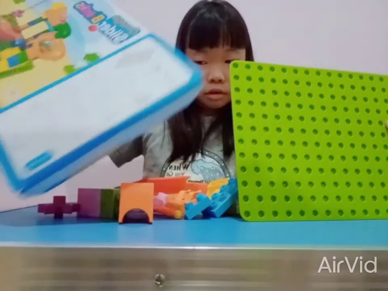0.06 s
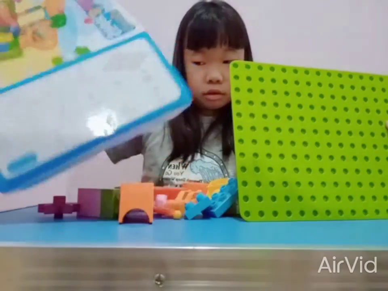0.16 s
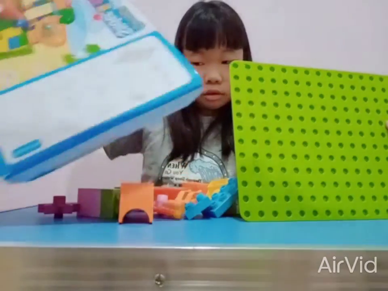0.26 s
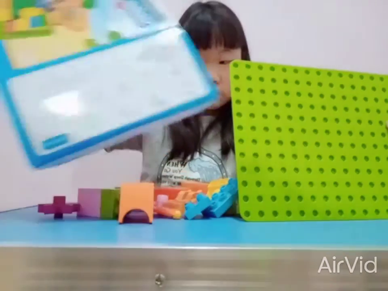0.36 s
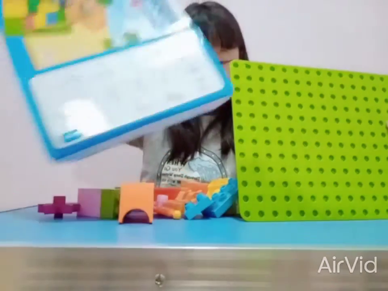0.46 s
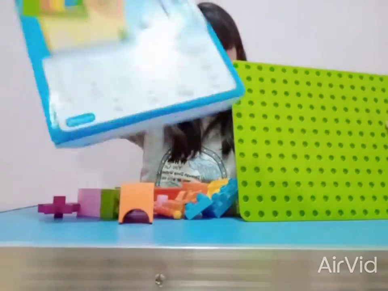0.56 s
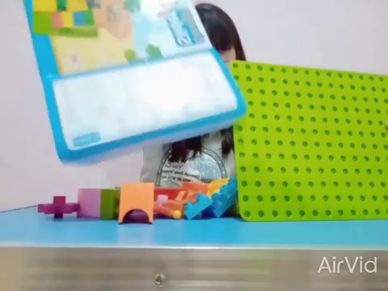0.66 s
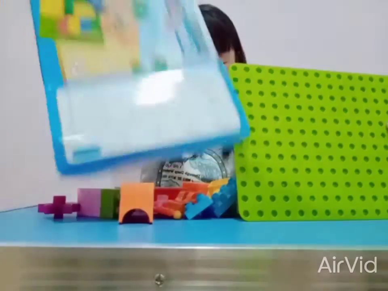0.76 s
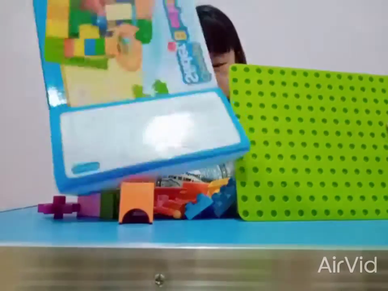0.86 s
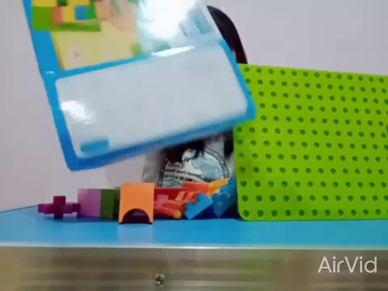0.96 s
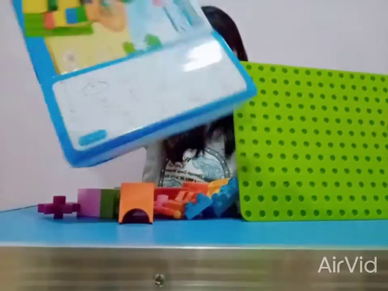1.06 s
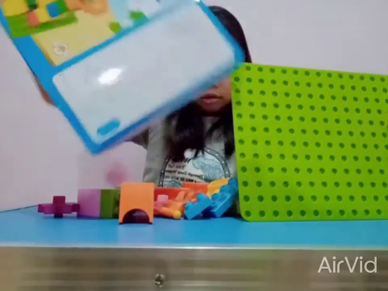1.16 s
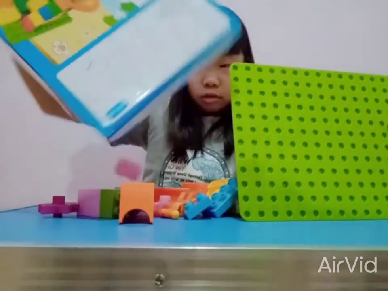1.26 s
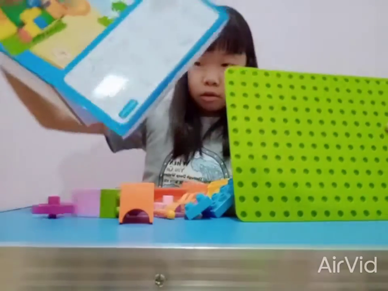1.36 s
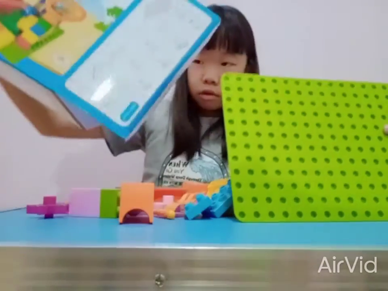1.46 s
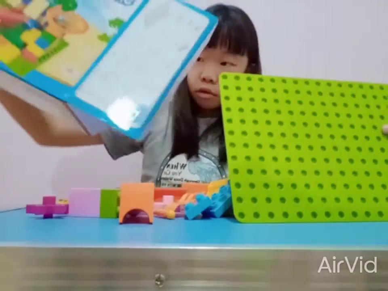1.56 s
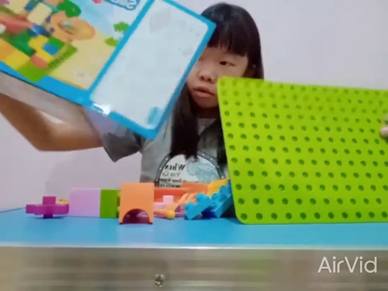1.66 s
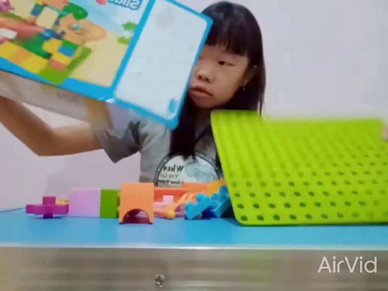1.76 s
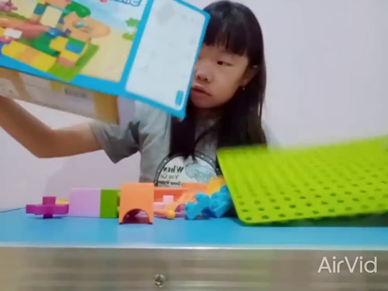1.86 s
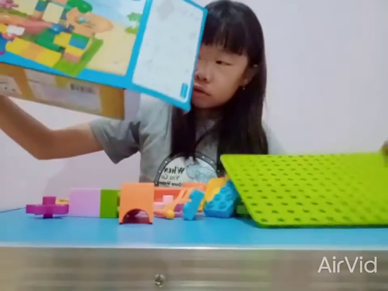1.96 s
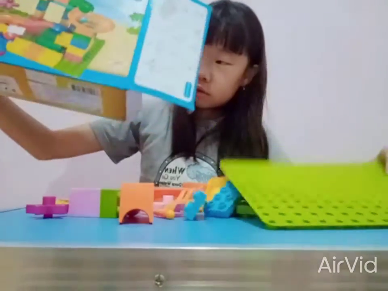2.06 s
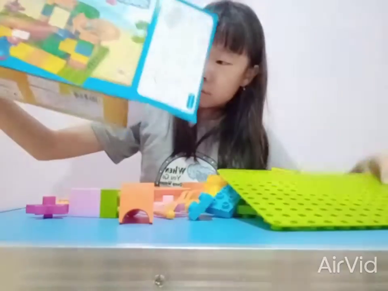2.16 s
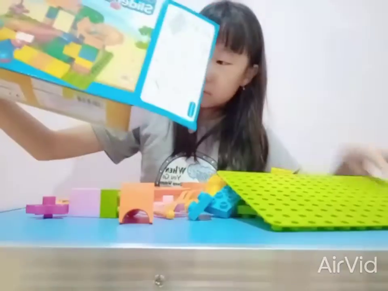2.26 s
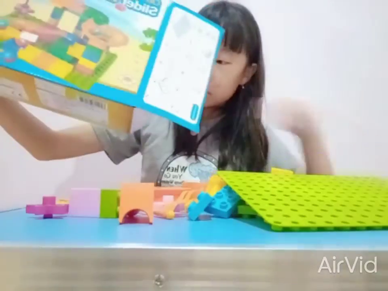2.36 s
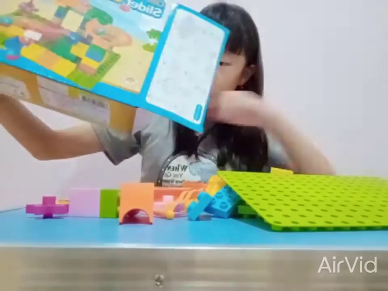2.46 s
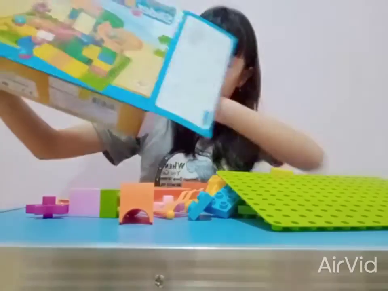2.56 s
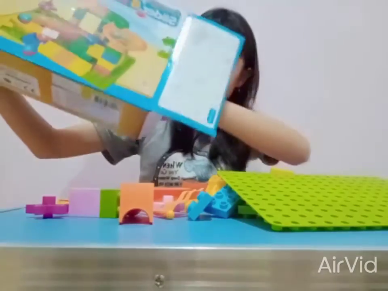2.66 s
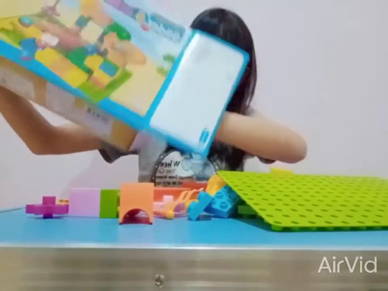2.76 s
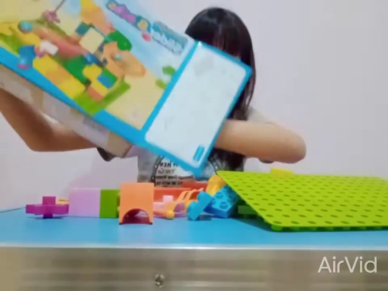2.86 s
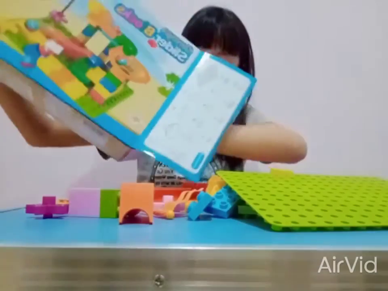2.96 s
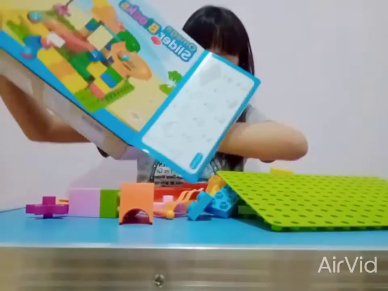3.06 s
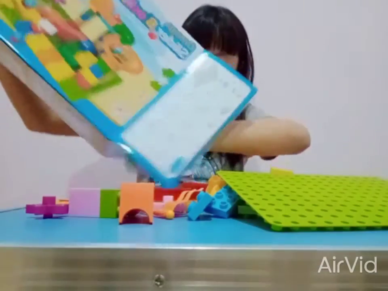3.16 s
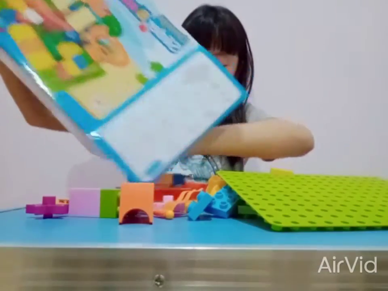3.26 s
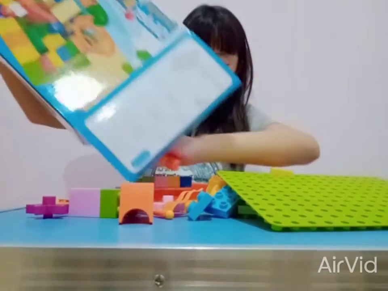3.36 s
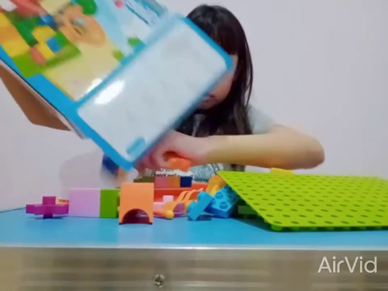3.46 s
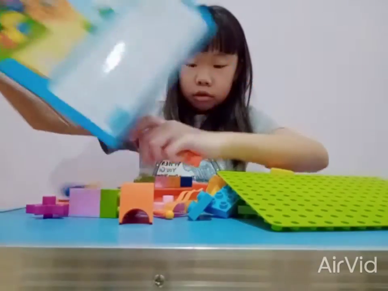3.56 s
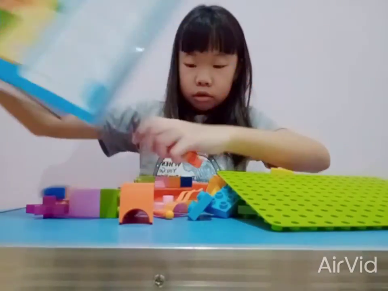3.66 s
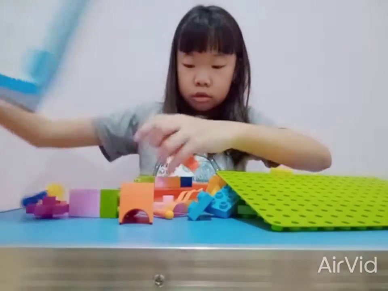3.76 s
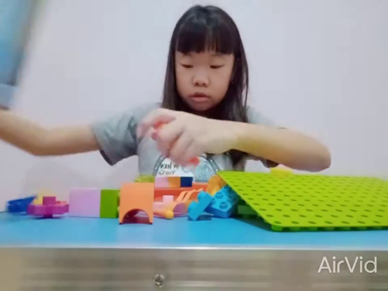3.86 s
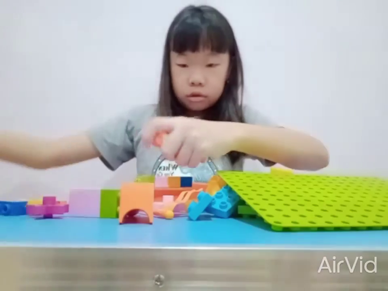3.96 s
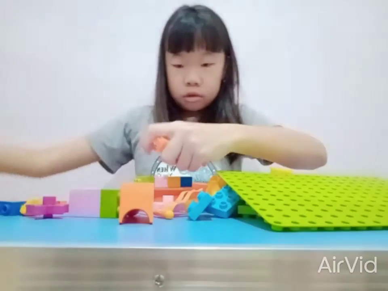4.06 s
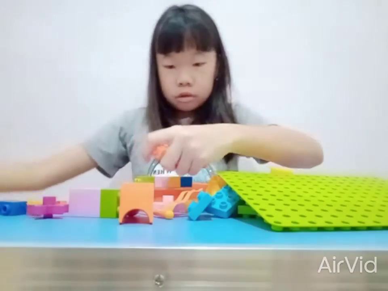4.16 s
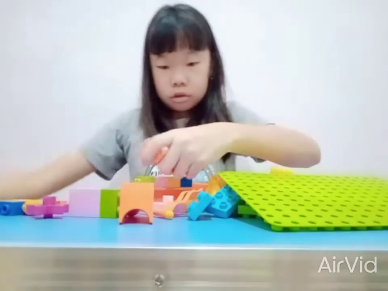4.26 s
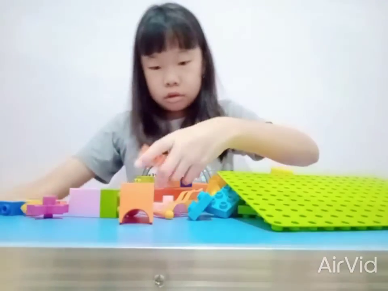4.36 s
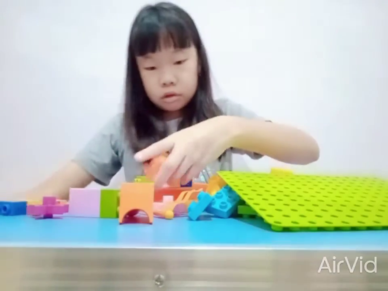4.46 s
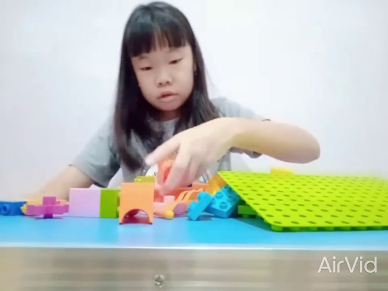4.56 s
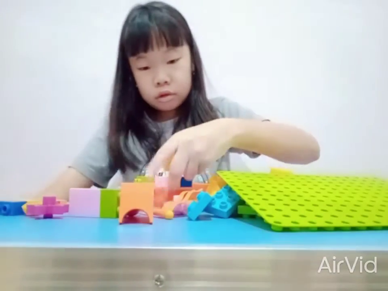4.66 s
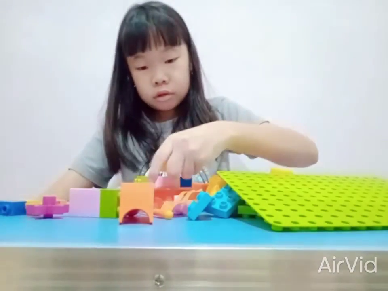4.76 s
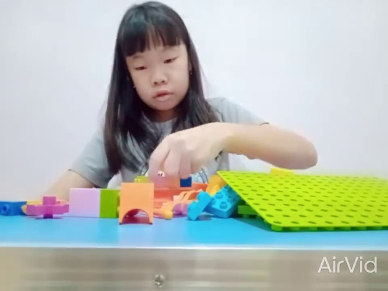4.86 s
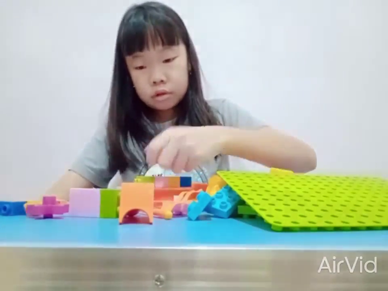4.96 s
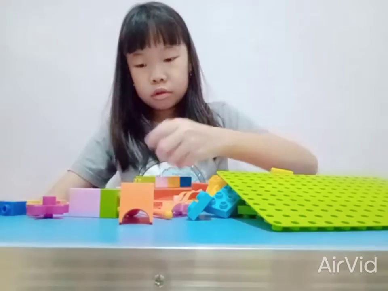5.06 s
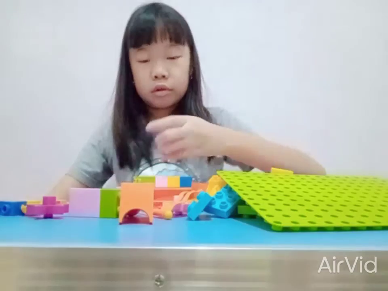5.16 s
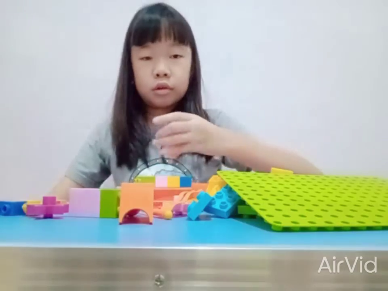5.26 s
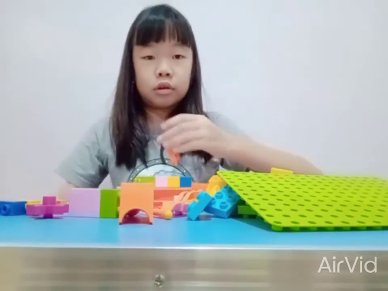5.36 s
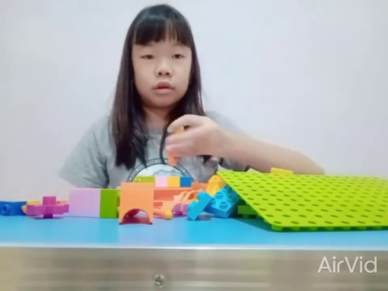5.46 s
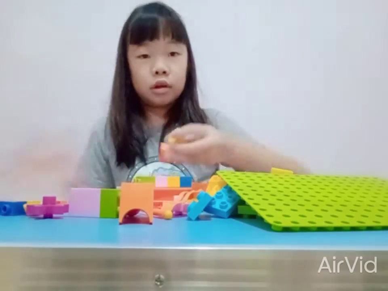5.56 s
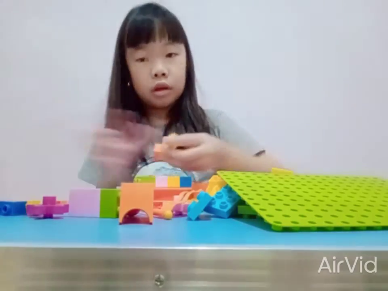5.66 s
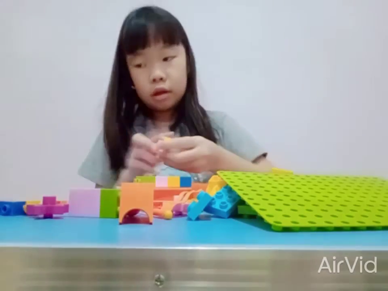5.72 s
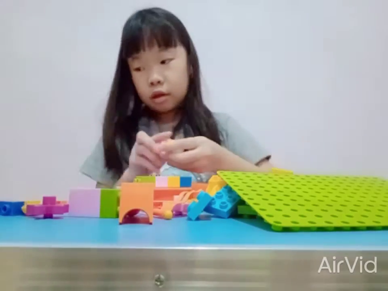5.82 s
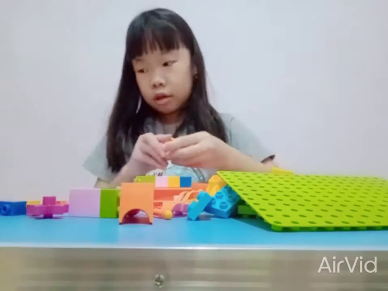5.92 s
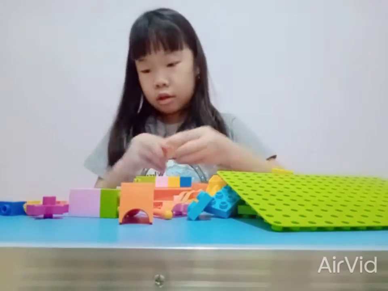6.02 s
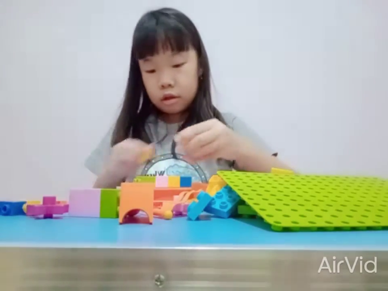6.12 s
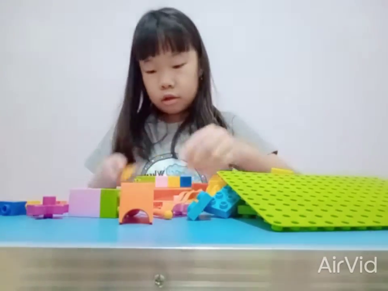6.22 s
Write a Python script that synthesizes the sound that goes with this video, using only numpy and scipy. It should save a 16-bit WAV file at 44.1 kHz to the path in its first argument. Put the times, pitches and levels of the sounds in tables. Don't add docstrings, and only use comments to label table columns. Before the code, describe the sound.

Close, boxy sound in a small bare room: toy bricks pour in uneven bursts, clacking brightly while cardboard panels knock and pieces slide and rattle. The pours thin out, return strongly, stop, and resume briefly. Afterwards only soft bumps, small plastic clicks and faint room air remain. The loudest blows distort slightly.

```python
import sys
import numpy as np
from scipy import signal
from scipy.fft import rfft, irfft, next_fast_len
from scipy.io import wavfile

SR = 44100
rng = np.random.default_rng(int(sys.argv[2]) if len(sys.argv) > 2 else 0)


def unload_audio(sound):
    columns = np.transpose(np.atleast_2d(sound))
    steps = np.round(np.clip(columns, -1, 1) * 32767)
    wavfile.write(sys.argv[1], SR, steps.astype(np.int16))


def gain_from_decibels(decibels):
    exponent = np.asarray(decibels, float) / 20
    return 10 ** exponent


N = 277389


def along(points, hz):
    f, v = np.transpose(points)
    return np.interp(np.log(hz + 1), np.log(f + 1), v)


def unit(x):
    return x / np.sqrt(np.mean(x ** 2) + 1e-20)


def filtered(x, response):
    m = next_fast_len(N + SR // 2)
    hz = np.fft.rfftfreq(m, 1 / SR)
    return irfft(rfft(x, m) * response(hz), m)[..., :N]


def colored_noise(spectrum):
    return unit(filtered(rng.standard_normal(N), lambda hz: gain_from_decibels(along(spectrum, hz))))


def ring(t, hz, t60, attack):
    decay = gain_from_decibels(-60 * t / t60)
    onset = 1 - np.exp(-t / attack)
    return decay * onset * np.sin(2 * np.pi * np.clip(hz, 20, 17000) * t)


def cluster(t, lo_hz, hi_hz, t60, attack, count):
    place = (np.arange(count) + rng.random(count)) / count
    size = gain_from_decibels(rng.normal(0, 3, count)) * rng.choice([-1, 1], count)
    hz = lo_hz * (hi_hz / lo_hz) ** place
    x = size @ ring(t, hz[:, None], t60, attack)
    return x / np.abs(x).max()


def add(track, s, x):
    part = track[max(round(s * SR), 0):][:len(x)]
    part += x[:len(part)]


def clacks():
    # start in seconds, peak in dB, main wall mode in Hz, studs in
    # dB, block body in dB.
    clack_events = [(0.0054, -8, 3140, -8, -21), (0.0272, -2.5, 2980, -10.5, -18.5),
                    (0.0332, -7.5, 2970, -18.5, -23.5), (0.0598, -12.5, 3170, -9, -13.5),
                    (0.087, -9, 2790, -6, -14), (0.1583, -19.5, 3030, -5, -5.5), (0.2004, -0.5, 3000, -19, -11),
                    (0.3318, -21.5, 2540, 0, -1), (0.3308, -9.5, 3170, -15, -7), (0.434, -10, 3300, -20, -10.5),
                    (0.4611, -18.5, 3800, -11.5, -4), (0.478, -36, 2820, -20, -5.5), (0.619, -30, 3540, -18, -6),
                    (0.7168, -42, 3530, -19, -8), (0.808, -35, 3100, -7.5, -5), (0.8463, -36.5, 2590, -5.5, 3.5),
                    (0.884, -34.5, 2840, -11, 7.5), (0.9213, -22.5, 2950, -10.5, -6),
                    (0.9323, -26, 2870, -14, -6.5), (0.9644, -38.5, 2950, -10, 6.5),
                    (0.9999, -15, 3000, -15.5, 2), (1.049, -8.5, 2960, -10.5, -17.5),
                    (1.104, -18, 3420, -8.5, -8), (1.1908, -18, 5260, -8, -16.5), (1.2079, -2, 3760, -12, -15.5),
                    (1.2119, -1.5, 2760, -7, -8.5), (1.271, -2.5, 5100, -3, -14.5),
                    (1.2954, -11.5, 2970, -12, -11), (1.34, 2, 4600, -15.5, -31), (1.3605, -1.5, 4900, -7, -20),
                    (1.3828, -1.5, 4870, -7.5, -13.5), (1.4438, -8, 3020, -10.5, -15),
                    (1.4672, 1, 4960, -6.5, -17.5), (1.4797, -3, 3550, -15, -14.5), (1.5121, -8, 3620, -8, -5.5),
                    (1.5629, -4, 4800, -10, -18),
                    (1.88, -8.5, 4780, -9.5, -14.5), (1.8933, -11.5, 2870, -10, -22),
              (1.9828, -11.5, 2950, -8, -9), (2.049, -19.5, 3090, -14.5, -8), (2.091, -17.5, 2820, -6, -2),
              (2.1179, -12, 2860, -6, -19), (2.2054, -22.5, 2760, -11.5, -4.5),
              (2.2093, -18.5, 3610, -13, -4), (2.2262, -10.5, 2670, -11, -9),
              (2.2365, -20, 3200, -11.5, -19), (2.247, -15, 3070, -33, -15),
              (2.2572, -10.5, 3100, -28.5, -2.5), (2.596, -29.5, 2430, -32, 9),
              (2.606, -6.5, 2765, -17.5, -18), (2.668, -19, 2744, -17, -5.5), (2.907, -45.5, 2780, -20, 2),
              (2.9758, -36, 2656, -12, 1), (3.0784, -28, 2770, -18.5, -10), (3.0988, -19.5, 3540, -8.5, -8),
              (3.1082, -20.5, 5330, -3, -13.5), (3.201, -4.5, 3206, -11, -10),
              (3.2049, -5, 3175, -16.5, -10), (3.216, -15, 3110, -14, -10.5),
              (3.2594, -0.5, 3046, -12.5, -13), (3.2791, -7.5, 3110, -8.5, -11),
              (3.3185, -6, 2800, -9, -8.5),
                    (3.5084, -4, 3450, -10, -10), (3.5217, -16.5, 5160, -14, -10), (3.5446, -6.5, 2680, -14.5, -9),
             (3.547, -8, 3068, -14.5, -9.5), (3.5723, -11, 2730, -17.5, -11.5),
             (3.5965, 1.5, 2860, -10, -12), (3.6314, -10, 2744, -9, -13.5), (3.6479, -7, 3740, -8.5, -19.5),
             (3.6577, -1, 3700, -10, -16.5), (3.6614, -7.5, 3500, -16, -8.5),
             (3.681, -15.5, 3025, 0, -17.5), (3.6949, -11.5, 3285, -8, -8.5),
             (3.7502, -8.5, 3790, -5, -12.5), (3.7575, -8.5, 3560, -22, -13),
             (3.8404, -12, 3230, -11, -4.5), (3.9112, -15, 2900, -16, -23), (3.9205, 0.5, 3610, -12, -14),
             (3.9354, -15.5, 2870, -18.5, -8.5), (3.976, -5, 3534, -5, -14), (4.0302, -11, 2870, -9, -12),
             (4.626, -19, 2940, -17.5, -11), (4.6551, -13, 2890, -13, -15),
             (4.6668, -11.5, 2635, -12.5, -16), (4.699, -4.5, 4050, -13.5, -16.5),
             (4.7037, -1, 4930, -6, -13.5), (4.7211, -2.5, 3330, -17, -12.5),
             (4.791, -4.5, 3410, -17, -14.5), (4.8043, -13, 2790, -11.5, -8.5),
             (4.8305, -15, 2930, -8, -8.5), (4.8406, -5, 5430, -10, -31), (4.9024, -7.5, 4700, -5, -22),
             (4.9458, -12.5, 3070, -8, -11.5), (5.0584, -35, 3030, -13, -15), (5.1211, -43, 2870, -20, 4.5),
             (5.228, -52, 2800, -19, 7), (5.2639, -36.5, 2980, -32, 3.5)]
    out, t = np.zeros(N), np.arange(SR // 24) / SR
    for s, db, wall_hz, stud_db, body_db in clack_events:
        wall = 0.75 * ring(t, wall_hz, 0.009, 0.00036)
        wall += 0.55 * cluster(t, 2500, 5200, 0.012, 0.0005, count=30)
        studs = gain_from_decibels(stud_db + 3.5) * cluster(t, 4870, 7805, 0.01, 0.0003, count=30)
        rims = gain_from_decibels(0.68 * stud_db - 14) * cluster(t, 7900, 13000, 0.018, 0.0003, count=30)
        body = gain_from_decibels(body_db + 6) * cluster(t, 1464, 2464, 0.0092, 0.0003, count=12)
        add(out, s, gain_from_decibels(db - 3.5) * (wall + studs + rims + body))
    return out


def edge_ticks():
    # start in seconds, peak in dB, edge mode in Hz.
    ticks = [(0.027, -24, 8680), (0.0622, -24, 8650), (0.0843, -21, 8830), (0.157, -23, 8800),
             (0.197, -30, 8400), (0.3311, -33, 9010), (1.048, -18, 8090), (1.1926, -20.5, 9000),
             (1.208, -13.5, 9600), (1.2693, -17.5, 7950), (1.3389, -19.5, 9770), (1.3588, -15, 8660),
             (1.4661, -22.5, 8520), (1.5316, -23, 9300), (1.8777, -17.5, 10480), (1.9819, -27, 8400),
             (2.092, -23, 11050), (2.1284, -26, 10500), (2.604, -41, 8500), (2.6065, -25.5, 9600),
             (3.2003, -19, 8480), (3.2616, -23.5, 8990), (3.277, -13, 10100), (3.5079, -24.5, 9040),
             (3.5435, -28, 8370), (3.595, -16, 8660), (3.6571, -16.5, 8030), (3.9195, -24.5, 7920),
             (3.921, -16.5, 7980), (3.9753, -18, 8020), (4.032, -19, 7940), (4.4423, -57, 8030),
             (4.6656, -24, 8800), (4.705, -14, 9350), (4.841, -28, 10150), (4.9014, -20, 8300)]
    out, t = np.zeros(N), np.arange(SR // 24) / SR
    for s, db, edge_hz in ticks:
        x = 0.84 * ring(t, edge_hz, 0.0082, 0.0003)
        x += 0.53 * cluster(t, 7900, 12500, 0.0039, 0.0003, count=30)
        x += 0.3 * cluster(t, 13500, 15600, 0.009, 0.0003, count=10)
        add(out, s, gain_from_decibels(db - 2.0) * x)
    return out


def knocks():
    # start in seconds, peak in dB, panel mode in Hz, hollow of the blocks in dB.
    landings = [(0.026, -6, 868, -8.5), (0.197, -4, 842, -4.5), (0.379, -14.5, 307, -37),
                (0.419, -11, 885, -8.5), (0.461, -6, 924, -12), (0.619, -21, 653, -12),
                (0.883, -15.5, 640, -9.5), (0.919, -13.5, 586, -5), (1.12, -17, 594, -8),
                (1.211, -10, 313, -6.5), (1.269, -23, 1003, 11), (1.382, -14.5, 710, -8.5),
                (1.47, -15, 338, -3), (1.512, -17.5, 934, -3.5), (1.743, -17.5, 696, -11),
                (2.093, -14.5, 802, -20), (3.095, -6, 491, -16), (3.104, -9, 520, -18.5),
                (3.257, -15, 968, -5.5), (3.278, -9.5, 898, -0.5), (3.507, -11.5, 1270, -0.5),
                (3.522, -21.5, 1202, -9.5), (3.544, -5.5, 950, -9), (3.556, -14, 893, 0.5),
                (3.569, -15, 584, -9.5), (3.597, -13, 957, -1), (3.838, -26, 877, 2.5),
                (3.918, -11.5, 958, -9), (3.869, -23.5, 900, 5), (3.975, -13.5, 873, 1),
                (4.625, -37, 954, 16), (4.706, -10.5, 798, -3), (6.271, -41, 572, -2)]
    # start in seconds, peak in dB, panel mode in Hz,
    # boom of the air in dB, t60 in seconds as the grip allows.
    thumps = [(0.319, -12.5, 915, -16.5, 0.15), (0.685, -19, 270, -3, 0.034), (0.807, -33, 283, 4, 0.17),
              (1.036, -6.5, 614, -19, 0.039), (1.155, -18.5, 607, -7, 0.011), (1.98, -29.5, 865, -3, 0.028),
              (2.224, -5.5, 877, -25, 0.033), (2.665, -9, 638, -11, 0.016), (2.606, -14.5, 1250, -37, 0.04),
              (2.871, -25.5, 664, -23, 0.054), (2.932, -33, 670, 2, 0.041), (2.972, -27.5, 715, -14, 0.076),
              (3.08, -17, 565, -10.5, 0.067), (3.144, -12, 415, -20, 0.043), (3.2, -1.5, 765, -24.5, 0.03),
              (5.119, -30.5, 237, -17, 0.069), (5.136, -24.5, 219, -14.5, 0.11),
              (5.196, -40, 220, -9, 0.097), (5.226, -32.5, 476, -25.5, 0.13),
              (5.266, -32.5, 468, -1.5, 0.12), (5.261, -20, 211, -3, 0.094),
              (0.963, -23, 350, -20.5, 0.039), (1.0008, -4.5, 639, -17, 0.028)]
    slams = [
        (1.058, -12.5, 605, -18, 0.036),
        (1.104, -20, 810, -20.5, 0.011),
        (1.879, -16.5, 488, -39, 0.064),
        (1.911, -27, 990, -6.5, 0.036),
        (2.605, -18, 438, -11.5, 0.17),
        (2.751, -25.5, 975, -19, 0.036),
        (4.831, -21, 880, -23, 0.086),
        (4.868, -17, 710, -10.5, 0.018),
        (6.006, -44, 893, -20, 0.056),
    ]
    blows = []
    for s, db, hz, hollow_db in landings:
        t60 = 0.042 * (600 / hz) ** 0.14 * gain_from_decibels(-0.079 * (db + 14))
        blows.append((s, db, hz, hollow_db, -43.5, t60))
    for rows, hollow_db in [(thumps, -11.5), (slams, -1)]:
        blows += [(s, db, hz, hollow_db, boom_db, t60) for s, db, hz, boom_db, t60 in rows]

    out, t = np.zeros(N), np.arange(SR // 5) / SR
    for s, db, panel_hz, hollow_db, boom_db, t60 in blows:
        t60 = np.clip(t60, 0.01, 0.3)
        panel = 0.7 * ring(t, panel_hz, 1.02 * t60, 0.58 / panel_hz)
        panel += 0.54 * cluster(t, 218.5, 350 + 0.807 * panel_hz, t60, 0.62 / panel_hz, count=12)
        hollow = gain_from_decibels(hollow_db - 1.0) * cluster(t, 990, 1584, 0.34 * t60, 0.00058, count=7)
        boom = gain_from_decibels(boom_db - 0.5) * cluster(t, 95, 170, 3.0 * t60, 0.00069, count=3)
        add(out, s, gain_from_decibels(db - 0.02) * (panel + hollow + boom))
    return out


def rings():
    # start in seconds, peak in dB, mode in Hz, t60 in seconds.
    modes = [(0.34, -18, 940, 0.1), (0.617, -14, 920, 0.019), (0.691, -17, 258, 0.092),
             (0.747, -30.5, 120, .07), (0.884, -25.5, 2080, 0.02), (0.462, -24.5, 96, 0.13),
             (1.001, -2, 933, 0.023), (1.766, -24.5, 1150, .04), (2.251, -25, 1270, 0.091),
             (2.672, -17.5, 947, 0.036), (2.68, -18, 641, .09), (3.222, -13, 602, 0.032),
             (3.1, -13, 490, .03), (4.537, -51.5, 10400, .012), (4.605, -42, 1270, .1),
             (4.634, -28, 1270, 0.12), (6.007, -33, 2056, .012), (6.0097, -10.5, 4800, 0.0054),
             (6.268, -42.5, 1270, .08), (6.27, -37.5, 2920, .04)]
    out, t = np.zeros(N), np.arange(SR // 5) / SR
    for s, db, hz, t60 in modes:
        add(out, s, gain_from_decibels(db) * ring(t, hz, np.clip(t60, 0.003, 0.3), 2.5 / hz))
    return out


def taps():
    # start in seconds, peak in dB, rib mode in Hz, stud mode in Hz, ribs and studs in dB.
    tapped = [
        (4.4411, -26.5, 3730, 7500, -4.5),
        (4.462, -33, 3720, 4830, 6.5),
        (4.536, -22.5, 4930, 7060, -1.5),
        (4.601, -37.5, 3900, 7770, 2),
    ]
    out, t = np.zeros(N), np.arange(SR // 24) / SR
    for s, db, rib_hz, stud_hz, upper_db in tapped:
        wall = 0.72 * ring(t, 3070, 0.019, 0.00052)
        upper = ring(t, rib_hz, 0.008, 0.00028) + 0.6 * ring(t, stud_hz, 0.011, 0.00071)
        spray = 0.092 * cluster(t, 8600, 12000, 0.0081, 0.00018, count=20)
        add(out, s, gain_from_decibels(db) * (wall + 0.81 * gain_from_decibels(upper_db) * upper + spray))
    return out


def snaps():
    # start in seconds, peak in dB, lowest mode in Hz, highest mode in Hz, edge in dB.
    snapped = [
        (5.7526, -34, 6310, 7700, -12),
        (5.755, -40.5, 2750, 3750, 9),
        (6.0069, -23.5, 3390, 4480, 2),
        (6.0074, -23, 4940, 6500, -8),
    ]
    out, t = np.zeros(N), np.arange(SR // 24) / SR
    for s, db, lo_hz, hi_hz, edge_db in snapped:
        edge = gain_from_decibels(edge_db) * cluster(t, 1.4 * hi_hz, 15600, 0.005, 0.0002, count=30)
        body = cluster(t, lo_hz, hi_hz, 0.0055, 0.0005, count=24)
        add(out, s, gain_from_decibels(db) * (body + edge))
    return out


def grains(per_s, size_db, spectrum, smooth):
    hit = rng.random(N) < per_s / SR
    size = gain_from_decibels(size_db * np.minimum(rng.exponential(size=N), 3.5))
    x = unit(hit * size * rng.standard_normal(N))
    x += smooth * rng.standard_normal(N)
    return unit(filtered(x, lambda hz: gain_from_decibels(along(spectrum, hz))))


def chatter(count):
    t, draw = np.arange(SR // 60) / SR, rng.random((count, 2))
    hz = 4020 * np.exp(0.3 * rng.standard_normal((2, count, 1)))
    size = gain_from_decibels(-3.5 * np.log(np.maximum(draw[:, 1:], 0.05)))
    contacts = size * ring(t, hz, 0.013, 0.00015).sum(0)
    where = (draw[:, :1] * N).astype(int) + np.arange(len(t))
    return unit(np.bincount(where.ravel(), contacts.ravel(), N)[:N])


def rattle():
    # time in seconds, stirring in dB, free against dragging pieces in dB.
    stirring = [(0.0, -15, 2), (0.3, -25.5, -5), (0.65, -49.5, -39), (1.2, -24, -11.5), (1.354, -23.5, 5.5),
                (1.871, -41, -12.5), (1.88, -24, 6.5), (2.15, -24.5, -1), (2.59, -79.5, -4),
                (2.888, -40, -14.5), (3.298, -15, -4.5), (3.499, -39.5, 0.5), (3.507, -19, -14),
                (3.89, -29.5, 0), (4.24, -69.5, -25.5), (4.66, -56.5, 6.5), (4.861, -23, 8),
                (5.2, -67, -0.5)]
    # start in seconds, scrape in dB, tick in dB, fizz in dB,
    # length in seconds.
    skids = [(0.322, -10, -8, -44, 0.02), (0.686, -22, -41, -50.5, 0.04), (0.797, -38, -38, -36.5, 0.065),
             (0.903, -40, -44.5, -22.5, 0.044), (1.688, -31, -24.5, -39.5, 0.07),
             (1.738, -15, -38, -55, 0.039), (1.758, -12.5, -52.5, -63, 0.028),
             (2.209, -10.5, -5, -31, 0.064), (2.24, -15, -24.5, -28.5, 0.028),
             (2.592, -39.5, -29, -19.5, 0.042), (2.887, -20.5, -45.5, -47, 0.052),
             (3.068, -27.5, -42, -42, 0.027), (3.078, -10, -13, -22, 0.041),
             (3.902, -31.5, -16.5, -40.5, 0.028), (4.433, -56, -35, -44, 0.012),
             (4.598, -13, -28.5, -48.5, 0.2), (5.12, -29, -66, -63, 0.019), (5.221, -36, -46, -36, 0.039),
             (5.258, -37, -40, -33, 0.041), (6.26, -24, -29.5, -33, 0.027)]
    # frequency in Hz, dB per Hz.
    tick_spectrum = [(710, -30), (1200, 7.5), (1310, 3), (2400, 4), (3590, -2), (4260, -19), (5530, -12),
                     (12500, -28.5), (15000, -31), (16000, -13.5)]
    scrape_spectrum = [(300, -120), (450, -4), (600, 0.5), (900, 4.5), (1300, -7), (1900, -12.5),
                       (2600, -14.5), (4000, -120)]
    rumble_spectrum = [(25, -26.5), (60, -60), (110, -14), (170, -4), (300, 7), (450, 5.5), (700, -120)]
    fizz_spectrum = [(4500, -120), (6000, -10), (7300, -5), (10000, -3.5), (13000, -15), (16000, -2.5)]

    s, *controls = np.transpose(stirring)
    t = np.arange(N) / SR
    stir_db, free_db = (np.interp(t, np.maximum.accumulate(s), c) for c in controls)
    away_db = -7.5 * np.clip((t - 3.85) / 0.21, 0, 1)
    tick = gain_from_decibels(stir_db + free_db - 13.0)
    scrape = gain_from_decibels(stir_db - 13.0)
    rumble = gain_from_decibels(stir_db - 6.5 + away_db - 13.0)
    fizz = gain_from_decibels(stir_db - 30)
    for s, scrape_db, tick_db, fizz_db, length in skids:
        swell = np.hanning(round(np.clip(length, 0.01, 0.2) * SR)) ** 0.62
        add(scrape, s, gain_from_decibels(scrape_db - 23) * swell)
        add(tick, s, gain_from_decibels(tick_db - 15.5) * swell)
        add(fizz, s, gain_from_decibels(fizz_db - 19.0) * swell)

    x = tick * grains(900, 2.2, tick_spectrum, smooth=0.4)
    x += fizz * grains(2000, 1.5, fizz_spectrum, smooth=0.7)
    x += gain_from_decibels(-6) * tick * chatter(count=1800)
    x += gain_from_decibels(4.14) * scrape * grains(600, 2.5, scrape_spectrum, smooth=0.4)
    return x + 2 * rumble * grains(200, 2, rumble_spectrum, smooth=0.5)


def table_top(x):
    # delay in seconds, level in dB.
    reflections = [
        (.0016, -5),
        (.0032, -10),
    ]
    return filtered(x, lambda f: 1 + sum(gain_from_decibels(db) * np.exp(-2j * np.pi * f * s) for s, db in reflections))


def room(x, echoes):
    # frequency in Hz, t60 in seconds.
    decay_times = [(100, 0.42), (400, 0.25), (1300, 0.39), (4000, 0.31), (9000, 0.33), (15000, 0.23)]
    out, hop = np.zeros(N), SR // 10
    for k in range(0, N, hop):
        hz, t, z = signal.stft(echoes[k // hop], SR, nperseg=256)
        t60 = np.clip(along(decay_times, hz), 0.05, 1)[:, None]
        tail = signal.istft(z * gain_from_decibels(-60 * t / t60), SR, nperseg=256)[1]
        tail = tail * (1 - np.exp(-np.arange(len(tail)) / SR / 0.00069))
        add(out, k / SR + 0.003, signal.fftconvolve(x[k:k + hop], tail / np.linalg.norm(tail)))
    return out


def hush():
    # frequency in Hz, dB per Hz.
    air_spectrum = [(15, -17.5), (25, 12.5), (180, 5.5), (394, -6), (531, -1), (796, -23), (1100, -16),
                    (1260, -8), (1560, -17.5), (3250, -20.5), (8830, -25.5), (14800, -24), (16000, -45.5)]
    return gain_from_decibels(-62) * colored_noise(air_spectrum)


def scene():
    echoes = rng.standard_normal((N // (SR // 10) + 1, SR // 2))
    hard = clacks() + edge_ticks()
    dull = knocks() + rings() + rattle()
    lone = taps() + snaps()
    direct = gain_from_decibels(0.5) * table_top(hard) + gain_from_decibels(4.0) * lone + dull
    reverberant = room(gain_from_decibels(2.5) * hard + gain_from_decibels(-0.5) * dull + gain_from_decibels(1.5) * lone, echoes)
    mono = direct + reverberant + hush()
    return np.array([mono, mono])


def microphone(x):
    # center in Hz, width in Hz, boost in dB.
    housing = [(580, 40, 3.5), (1270, 88.5, 12), (2870, 520, 4), (3640, 820, 3), (5590, 280, 5.5),
               (6910, 610, 4), (13100, 2000, -5.5), (15220, 510, 5)]

    def response(f):
        bass_cut = (1j * f / (70 + 1j * f)) ** 2
        boosts = [1 + (gain_from_decibels(db) - 1) * 1j * f * w / (c * c - f * f + 1j * f * w) for c, w, db in housing]
        return bass_cut * np.prod(boosts, axis=0)

    clipped = np.clip(filtered(x, response), -1.05, 1.05)
    return filtered(clipped, lambda f: np.clip((15700 - f) / 400, 0, 1))


def side_signal(mid):
    # frequency in Hz, side minus mid in dB.
    spread = [(300, -45), (3500, -51), (6000, -27), (15000, -14.5)]
    # start in seconds, side minus mid in dB.
    wide_moments = [(1.188, -6), (1.462, -6.5), (1.482, -7), (1.875, -4), (2.113, -4), (3.255, -9),
                    (3.502, -15), (3.555, -6.5), (3.908, -2), (4.533, -8), (4.662, -4.5), (5.75, -3),
                    (6.005, -5)]
    # frequency in Hz, dB per Hz.
    hiss = [(15, -46), (25, -10.5), (108, -3.5), (1070, -5.5), (1260, 1.5), (1560, -7.5), (14800, -19.5),
            (16000, -26)]
    hz, _, z = signal.stft(mid, SR, nperseg=256)
    turned = z * np.exp(2j * np.pi * rng.random(z.shape))
    side = signal.istft(turned * gain_from_decibels(along(spread, hz) - 5.0)[:, None], SR, nperseg=256)[1][:N]
    wide = np.zeros(N)
    for s, db in wide_moments:
        add(wide, s, gain_from_decibels(db) * signal.windows.tukey(round(0.012 * SR)))
    side += wide * signal.istft(turned * (hz > 5000)[:, None], SR, nperseg=256)[1][:N]
    noise = filtered(rng.standard_normal(N), lambda f: gain_from_decibels(along(hiss, f)) * (f < 15600))
    return side + gain_from_decibels(-69.5) * unit(noise)


def low_pass(x):
    return signal.sosfilt(signal.butter(12, 16830, fs=SR, output="sos"), x)


def record(dry):
    mid = microphone(dry[0])
    side = side_signal(mid)
    return low_pass(np.clip([mid + side, mid - side], -1, 1))


dry = scene()
out = record(dry)
unload_audio(out)
```